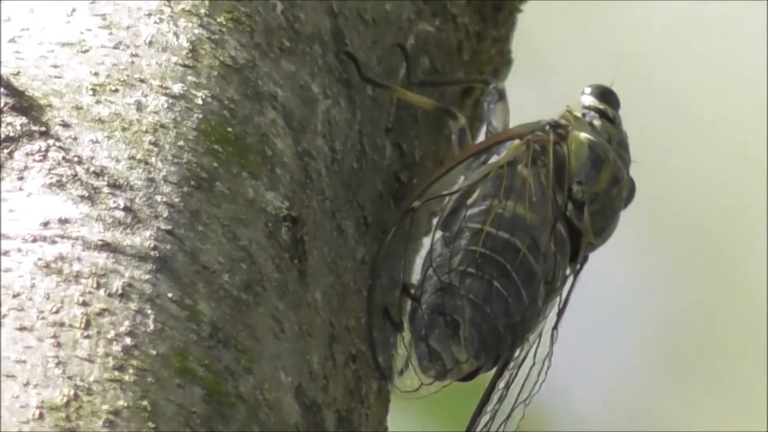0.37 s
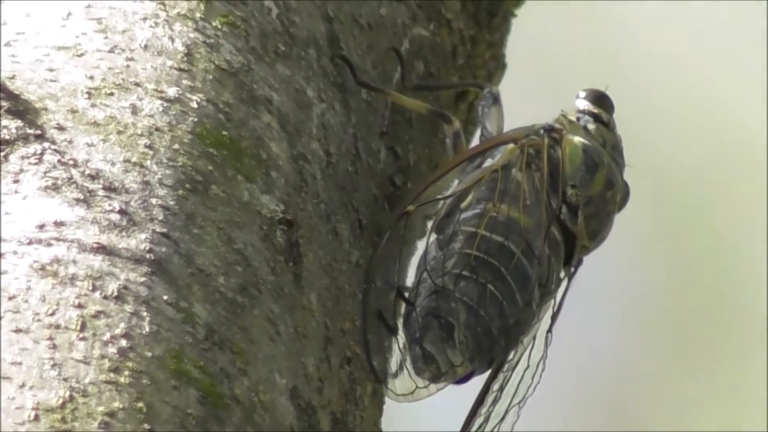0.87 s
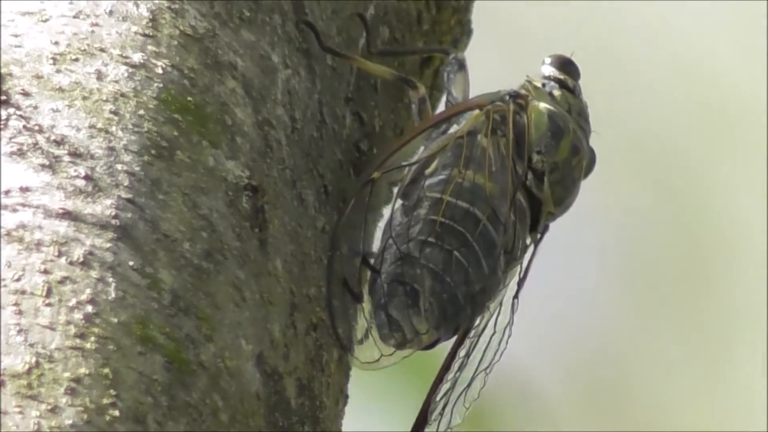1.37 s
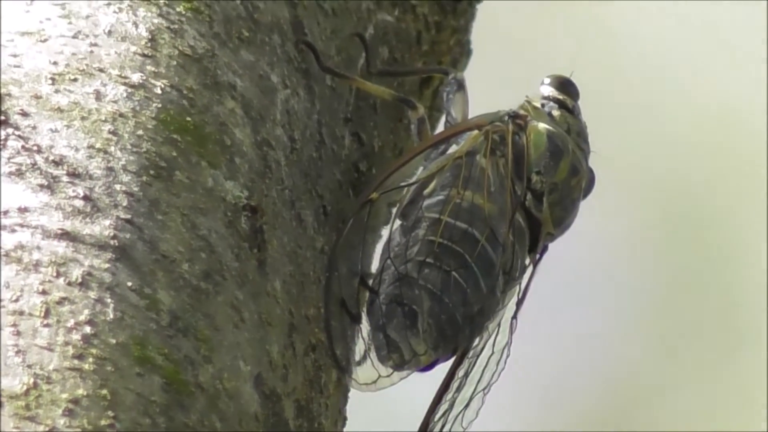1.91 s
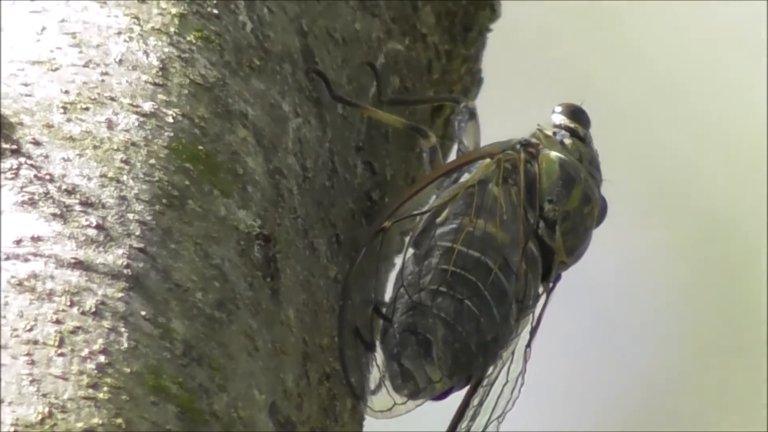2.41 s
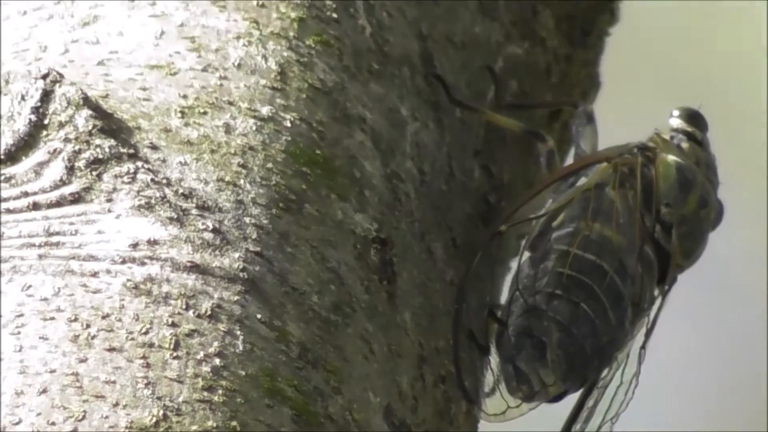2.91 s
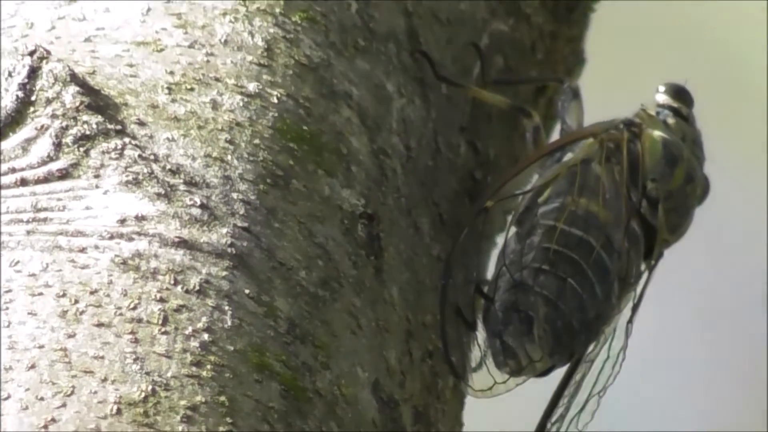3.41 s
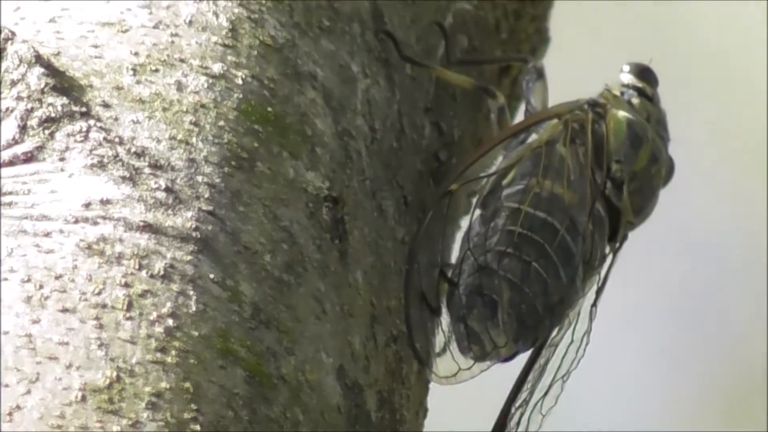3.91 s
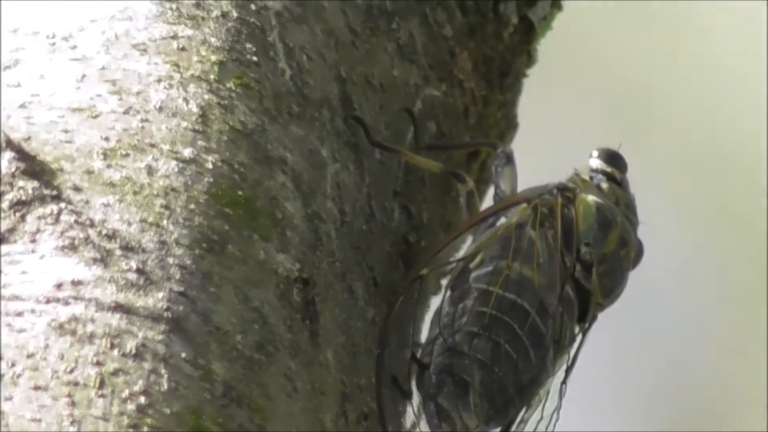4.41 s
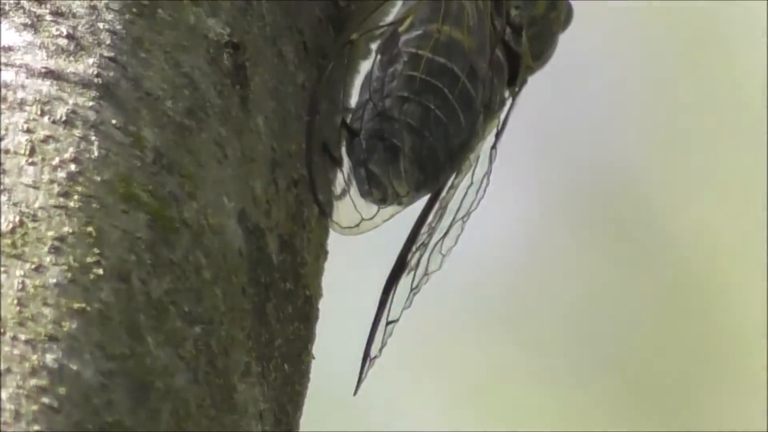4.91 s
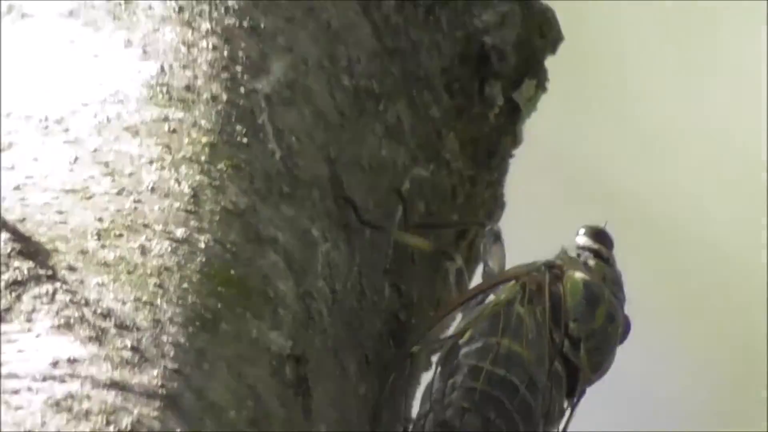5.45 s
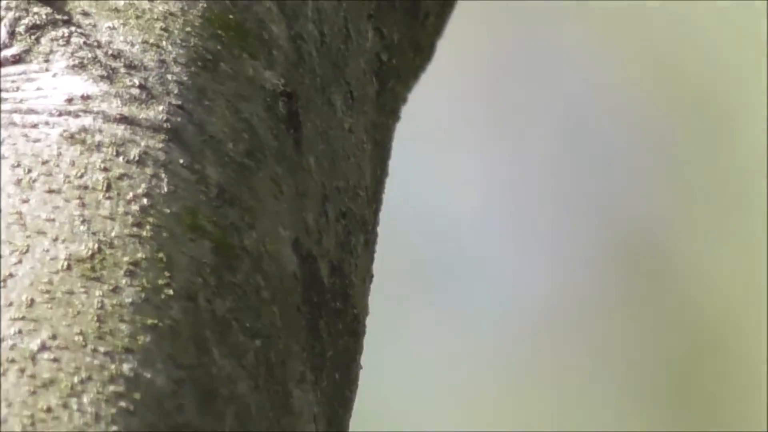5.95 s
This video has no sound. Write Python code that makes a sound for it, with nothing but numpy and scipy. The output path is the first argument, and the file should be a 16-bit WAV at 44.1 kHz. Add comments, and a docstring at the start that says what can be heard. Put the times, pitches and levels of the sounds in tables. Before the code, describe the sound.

From 0 to about 6 seconds a single cicada, close on a tree trunk in a park, sings continuously. Its tone is high and piercing, a buzzing ring around five kilohertz alternating with a brighter, scratchy rasp about sixteen times a second, so the drone flutters rapidly and evenly. Its level wavers only slightly, a little stronger near 2 and 3 seconds and softer around 4.5, and the flutter grows shallower after 5. At 0 a strong gust thumps low on the microphone for roughly half a second, then drops away; small, weak puffs follow, notably near 1.5 and between 3 and 4 seconds. Behind lie a steady hiss of distant cicadas, soft leaf rustle and faint low traffic. Barely noticeable dull knocks fall at 3.0 and 4.1, and faint dry ticks at 5.1, 5.6 and 5.8. The song is still going at the end.

```python
"""Throughout: a close cicada on a trunk in a park, over a far chorus, traffic, leaves and breeze (shaped noises).
Its two tymbals buckle in turn; about sixteen pumps/s swing body resonances between deep ring and bright rasp.
0 s: the hardest gust thumps on the microphone ports for about half a second; weaker gusts (noise) follow.
3.0 and 4.1 s: soft knocks. 5.1, 5.6 and 5.8 s: faint ticks. Both are resonant noise bursts."""
import sys
import numpy as np
from scipy import signal
from scipy.fft import rfft, irfft, next_fast_len
from scipy.io import wavfile

SR = 44100
rng = np.random.default_rng(int(sys.argv[2]) if len(sys.argv) > 2 else 0)


def gain_from_decibels(decibels):
    """Convert decibel values to linear amplitude factors."""
    exponent = np.asarray(decibels, float) / 20
    return 10 ** exponent


def to_wav(sig):
    """Store sig (one row per channel, or 1-D mono) as 16-bit WAV at the path in sys.argv[1].

    Samples outside -1..1 are clipped; the rate is SR.
    """
    pcm = np.clip(np.atleast_2d(sig), -1, 1) * 32767
    pcm = np.round(pcm).astype(np.int16)
    wavfile.write(sys.argv[1], SR, pcm.T)  # frames by channels


N = 267378
SIZE = next_fast_len(N + SR)
BIN_HZ = np.maximum(np.arange(SIZE // 2 + 1) * SR / SIZE, 1)
TOP_CUT_HZ = 15740

# port pair: f/Hz, left-right level/dB, likeness/0-1 (for paired sounds), right phase lead/rad
PORT_PAIR = [(30, -6, 1, 1.5), (332, 0, 0.38, 2.2), (543, -1, 0.46, 0.13), (915, -0.5, 0.47, .05),
             (1340, 3.5, 0.65, .1), (2580, -1.5, 0.78, 0.17), (4300, -3.5, 0.61, 0.15), (5860, -1, 1, 1.16),
             (6310, -6, 0.38, 2.17), (7600, -2.5, 0.54, 2.92), (9150, 0, 0.53, 3.8),
             (11000, 6.5, 0.88, 4.55), (12300, 3, 0.32, 2.7), (13500, 10.5, .15, 4.4),
             (14800, 6.5, 0.35, 1.5)]

# noise spectra, relative: f/Hz, density/dB per Hz
TRAFFIC_SPECTRUM = [(90, -1), (130, -2), (190, -3.5), (250, -1.5), (310, 0.5), (400, -7.5), (580, -1.5),
                    (760, -5.5)]
LEAF_SPECTRUM = [(800, -3.5), (1000, 0.5), (1500, -2.5), (2000, 0.5), (2500, 1.5), (3200, -2), (3700, -5)]
CHORUS_SPECTRUM = [(3800, -11.5), (4400, -4), (5000, -0.5), (5400, -0.5), (6000, -3), (6250, -5.5),
                   (7000, -6), (8300, -7.5), (9300, -9.5), (10500, -10.5), (11800, -3.5), (13200, -6.5),
                   (14300, -4), (15700, -4)]
EDDY_SPECTRUM = [(20, -6.5), (45, 9.5), (70, 5.5), (110, -8), (170, -6.5), (260, -24), (400, -16.5)]
BUFFET_SPECTRUM = [(40, -12), (70, -7), (103, 0), (150, -6), (240, -15), (350, -28)]
TRAFFIC_DB, LEAVES_DB, CHORUS_DB = -39, -39, -29.5  # ahead of port balance

# light breeze, ahead of wind gains: t/s, level/dB
BREEZE_LEVEL = [(0, -34), (.9, -46), (2.5, -46.5), (4.3, -47), (5.0, -48.5), (6.06, -49)]
# gusts, ahead of wind gains: start t/s, hold/s, level/dB, left-right level/dB
GUST_EVENTS = [(0, 0.34, -21, 3), (0.606, .04, -33.5, 5.5), (1.22, .14, -44, 10), (1.494, 0.017, -26, 6.5),
               (1.606, 0.19, -37.5, 8.5), (1.82, 0.028, -41, -4), (1.93, .1, -47, 5), (2.54, 0.16, -40, -1),
               (2.766, 0.053, -39.5, 16), (2.898, 0.097, -41, -1), (3.224, 0.05, -39, 9),
               (3.393, 0.022, -36.5, 5), (3.495, .13, -34.5, 5), (3.72, 0.097, -40.5, 5),
               (3.94, .05, -34.5, 5), (4.076, 0.15, -41, 11), (4.52, .1, -44, 13), (5.768, .08, -41, 0)]
GUST_RISE_DB_PER_S, GUST_FALL_DB_PER_S, BREEZE_PAN_DB = 252, 153, 2.5

# ticks and knocks: t/s, peak level/dB, f/Hz, width/share of f
TICK_EVENTS = [(3.012, -31, 285, .9), (4.075, -33, 305, .9), (5.0615, -17, 1500, 2.5),
               (5.6045, -18.5, 3500, .8), (5.835, -23, 3200, .8)]

# song: t/s, level/dB
SONG_LEVEL = [(0, -30), (.6, -31.5), (1.3, -31), (1.8, -28.5), (2.3, -30.5), (2.9, -29), (3.5, -30.5),
              (4.1, -32.5), (4.7, -33), (5.3, -31), (6.06, -30.5)]
# abdomen: t/s, pumping depth/0-1, lag/pump cycles
PUMP_COURSE = [(0, .7, 0), (1.2, .9, 0), (4.7, .88, 0), (5.3, .6, .06), (6.06, .55, .06)]
# body resonances: f/Hz, width of one pass/Hz, level/dB
DEEP_RING_MODES = [(2710, 120, -13), (4810, 350, -13), (5200, 240, 1), (5580, 250, -8), (5980, 250, -10),
                   (6370, 200, -13)]
BRIGHT_RASP_MODES = [(6866, 90, -5.5), (7540, 1300, -14.5), (8290, 1750, -17.5), (12460, 1200, -29.5),
                     (14180, 550, -10), (14360, 1100, -10.5), (15300, 700, -16)]
BUCKLES_PER_S, QUICKENS_PER_S2 = 191.25, .405  # one tymbal: rate at start, steady rise
SECOND_TYMBAL_LAG_MS = 0.099  # past the half cycle
PUMPS_PER_S = 15.64
RING_OPENS_AT, RING_RISE, RING_HOLD, RING_FADE = .74, .12, .18, .38  # pump cycles
RING_OPEN_DB, RING_SHUT_DB = 4, -10.5  # at full depth
RASP_PEAK_AT_CYCLES, RASP_SWING_DB = .57, 3.4  # swing at full depth
PUMP_BEND_TURNS, PUMP_BEND_AT_CYCLES = 0.006, 0.3  # clicks run early and late with each pump
SCRATCH_ABOVE_HZ = 13700
FOLIAGE_T60_S, FOLIAGE_DB = 0.02, -9


def rms_one(x):
    """Scale to rms 1."""
    return x / np.sqrt(np.mean(x ** 2) + 1e-20)


def in_time(rows):
    """Table columns as curves over all samples."""
    s, *columns = np.transpose(rows)
    return [np.interp(np.arange(N) / SR, s, c) for c in columns]


def in_pitch(rows):
    """Table columns as curves over all bins, on a log f axis."""
    hz, *columns = np.transpose(rows)
    return [np.interp(np.log(BIN_HZ), np.log(hz), c) for c in columns]


def drift(corner_hz):
    """Slow chance, rms 1: noise at every 20th sample through two equal one-pole low-passes."""
    r = np.exp(-40 * np.pi * corner_hz / SR)
    noise = rng.standard_normal(N // 20 + 4002)
    slow = signal.lfilter([1], [1, -2 * r, r * r], noise)[4000:]  # settled part
    return np.interp(np.arange(N) / 20, np.arange(len(slow)), rms_one(slow - slow.mean()))


def resonance(x, hz, width_hz):
    """Two-pole band-pass, peak gain 1."""
    r = np.exp(-np.pi * width_hz / SR)
    zeros = np.array([1, 0, -1]) * (1 - r * r) / 2
    return signal.lfilter(zeros, [1, -2 * r * np.cos(2 * np.pi * hz / SR), r * r], x)


def coloured(spectrum):
    """Two unrelated noises of one spectrum, falling 40 dB/octave outside the table; joint rms 1."""
    below_octaves = np.maximum(np.log2(spectrum[0][0] / BIN_HZ), 0)
    above_octaves = np.maximum(np.log2(BIN_HZ / spectrum[-1][0]), 0)
    gain = gain_from_decibels(in_pitch(spectrum)[0] - 40 * (below_octaves + above_octaves))
    white = rng.standard_normal((2, SIZE))
    return rms_one(irfft(rfft(white) * gain, SIZE)[:, :N])


def ports(x, other=None):
    """Two close ports: the right hears x phase-shifted, mixed with other where the field is diffuse."""
    pan_db, alike, ahead_rad = in_pitch(PORT_PAIR)
    left = rfft(x, SIZE)
    right = left * np.exp(1j * ahead_rad)
    if other is not None:
        alike = np.clip(alike, 0, 1)
        right = alike * right + np.sqrt(1 - alike ** 2) * rfft(other, SIZE)
    return irfft([left * gain_from_decibels(pan_db / 2), right * gain_from_decibels(-pan_db / 2)], SIZE)[:, :N]


def traffic():
    """Far low rush: shaped noise whose level comes in lumps."""
    level_db = TRAFFIC_DB + .5 * drift(0.74) + 2.4 * drift(21.6)
    return gain_from_decibels(level_db) * ports(*coloured(TRAFFIC_SPECTRUM))


def leaves():
    """Even rustle from the trees around: shaped noise, slight level drift."""
    level_db = LEAVES_DB + .3 * drift(2.5) + .6 * drift(40)
    return gain_from_decibels(level_db) * ports(*coloured(LEAF_SPECTRUM))


def chorus():
    """So many far singers that their clicks merge into a hiss."""
    level_db = CHORUS_DB + 0.22 * drift(0.22) + 0.19 * drift(4.9)
    return gain_from_decibels(level_db) * ports(*coloured(CHORUS_SPECTRUM))


def gusts():
    """Wind level and left-right balance in dB: gusts rise, hold and die away over a light breeze."""
    t = np.arange(N) / SR
    start, hold, db, pan_db = np.transpose(GUST_EVENTS)[:, :, None]
    rise_db = GUST_RISE_DB_PER_S * np.maximum(start - t, 0)
    fall_db = GUST_FALL_DB_PER_S * np.maximum(t - start - hold, 0)
    power = gain_from_decibels(2 * (db - rise_db - fall_db))
    breeze = gain_from_decibels(2 * in_time(BREEZE_LEVEL)[0])
    total = power.sum(axis=0) + breeze
    balance_db = (np.sum(power * pan_db, axis=0) + breeze * BREEZE_PAN_DB) / total
    return 10 * np.log10(total), balance_db


def wind(opposed=0.54, strong_db=-36, steepness=0.82):
    """Lumpy pressure noise, partly opposed at the ports; strong gusts shake them partly alike, higher up."""
    level_db, pan_db = gusts()
    one, two = coloured(EDDY_SPECTRUM) * gain_from_decibels(0.8 * np.array([drift(26), drift(11)]))
    eddies = np.array([one, np.sqrt(1 - opposed ** 2) * two - opposed * one])
    shake, own = coloured(BUFFET_SPECTRUM)
    buffet = np.array([shake, 0.47 * shake + 0.85 * own])
    strong = 1 / (1 + gain_from_decibels(-steepness * (level_db - strong_db)))  # share, grows with the gust
    pressure = 2.78 * (1 - strong) * eddies + 0.85 * strong * buffet
    return pressure * gain_from_decibels(level_db + pan_db * np.array([[.5], [-.5]]))


def ticks():
    """Soft grainy bursts, each around one pitch, dying the sooner the wider they are."""
    out, t = np.zeros(N), np.arange(4000) / SR
    grains = rng.standard_normal((len(TICK_EVENTS), 4000))
    for (s, db, hz, breadth), grain in zip(TICK_EVENTS, grains):
        at, width_hz = round(s * SR), breadth * hz
        fading = grain * np.exp(-t * width_hz / 5)
        burst = resonance(resonance(fading, hz, width_hz), hz, width_hz)
        out[at:at + 4000] += gain_from_decibels(db) * burst / np.abs(burst).max()
    return out


def tymbal(turns, uneven_db):
    """One sharp click per turn (84 equal harmonics), each with a strength of its own."""
    half_rad = np.pi * ((turns + .5) % 1 - .5) + 1e-9
    clicks = np.sin((2 * 84 + 1) * half_rad) / np.sin(half_rad) - 1
    strength = gain_from_decibels(uneven_db * rng.standard_normal(N // 100))
    return clicks * strength[np.round(turns).astype(int)]


def pump(cycle):
    """Ring and rasp dB over a pump: ring opens fast, holds, fades; rasp swells while the ring is shut."""
    since = (cycle - RING_OPENS_AT) % 1
    corners = np.cumsum([0, RING_RISE, RING_HOLD, RING_FADE])
    ring_db = np.interp(since, corners, [RING_SHUT_DB, RING_OPEN_DB, RING_OPEN_DB, RING_SHUT_DB])
    rasp_db = RASP_SWING_DB * np.cos(2 * np.pi * (cycle - RASP_PEAK_AT_CYCLES))
    return ring_db, rasp_db


def body(drive, modes):
    """Each resonance twice over, so valleys stay dark; neighbouring modes swing in opposite sign."""
    return sum((-1) ** k * gain_from_decibels(db) * resonance(resonance(drive, hz, width_hz), hz, width_hz)
               for k, (hz, width_hz, db) in enumerate(modes))


def foliage(ring):
    """Leaves scatter the ring into two unrelated, fast-dying noise tails."""
    t = np.arange(SR // 2) / SR
    tail = rng.standard_normal((2, SR // 2)) * gain_from_decibels(-60 * t / FOLIAGE_T60_S)
    tail /= np.sqrt(np.sum(tail ** 2, axis=1, keepdims=True))
    return signal.fftconvolve(ring[None], tail, axes=1)[:, :N]


def cicada(wander_turns=.003, uneven_db=2.5, scratch=1.5):
    """Two tymbals drive one body whose ring and rasp swing with each pump; foliage scatters the ring."""
    (level_db,), (depth, behind) = in_time(SONG_LEVEL), in_time(PUMP_COURSE)
    t = np.arange(N) / SR
    per_s = BUCKLES_PER_S + QUICKENS_PER_S2 * t
    cycle = PUMPS_PER_S * t - behind + 0.0029 * drift(1.1)
    turns = 1 + np.cumsum(per_s) / SR + wander_turns * (drift(40) + 2 * drift(5))
    turns += PUMP_BEND_TURNS * np.sin(2 * np.pi * (cycle - PUMP_BEND_AT_CYCLES))
    lag_turns = .5 + per_s * SECOND_TYMBAL_LAG_MS / 1000
    clicks = rms_one(tymbal(turns, uneven_db) + tymbal(turns - lag_turns, uneven_db))
    deep, bright = [gain_from_decibels(depth * db + 0.19 * drift(59)) for db in pump(cycle)]
    ring = body(clicks * deep, DEEP_RING_MODES)
    # ribs slip unevenly: a fine scratch
    slips = signal.butter(2, SCRATCH_ABOVE_HZ, "high", fs=SR, output="sos")
    noise = signal.sosfilt(slips, rng.standard_normal((2, N)))
    # short waves also arrive by way of the trunk and branches, 13 ms late
    echoed = np.roll(clicks, round(.013 * SR))
    rasp = body((np.array([clicks, echoed]) + scratch * noise) * bright, BRIGHT_RASP_MODES)
    song = ports(ring) + gain_from_decibels(FOLIAGE_DB) * ports(*foliage(ring)) + ports(*rasp)
    return gain_from_decibels(level_db) * rms_one(song)


def scene():
    """All sources at the two ports."""
    return traffic() + leaves() + chorus() + wind() + ticks() + cicada()


def band_limit(x):
    """A steep low-pass at the top of the band."""
    return signal.sosfilt(signal.butter(12, 16710, fs=SR, output="sos"), x)


def record(dry):
    """Brick-wall cut at the top, over the last 40 Hz."""
    top_gain = np.clip((TOP_CUT_HZ - BIN_HZ) / 40, 0, 1)
    mix = irfft(rfft(dry, SIZE) * top_gain, SIZE)[:, :N]
    return band_limit(mix)


dry = scene()
out = record(dry)
to_wav(out)
```